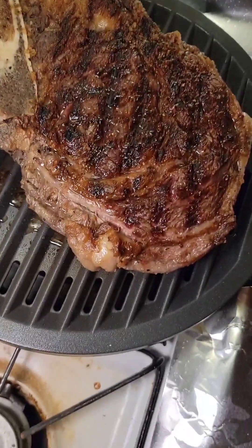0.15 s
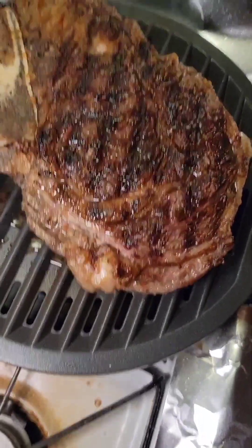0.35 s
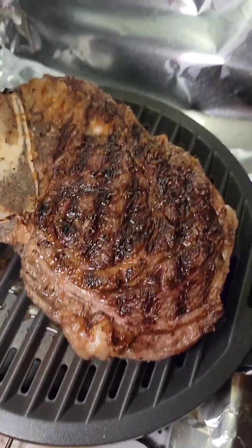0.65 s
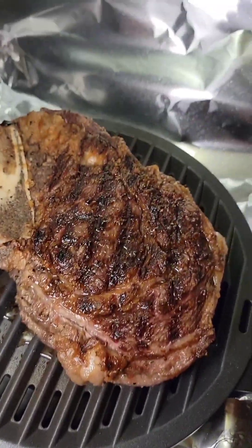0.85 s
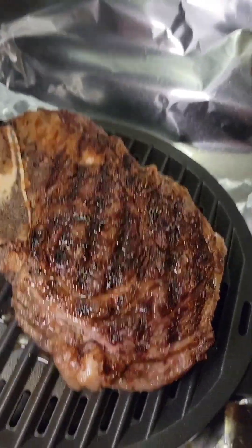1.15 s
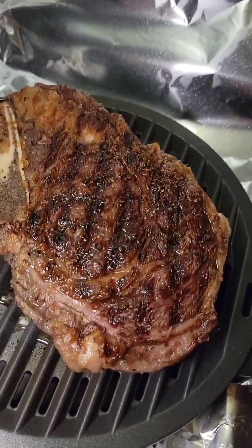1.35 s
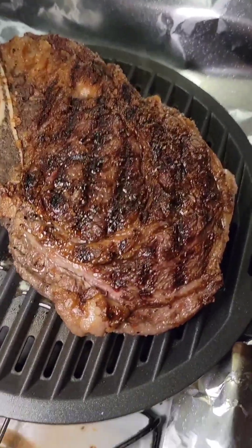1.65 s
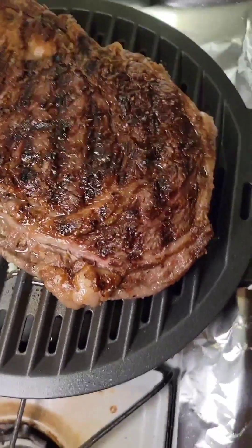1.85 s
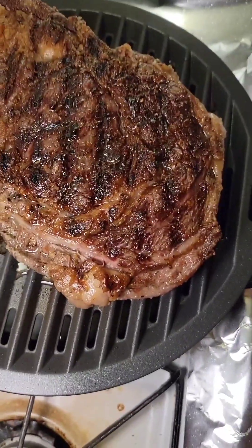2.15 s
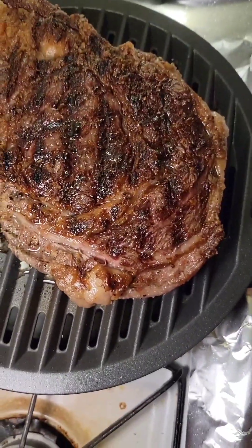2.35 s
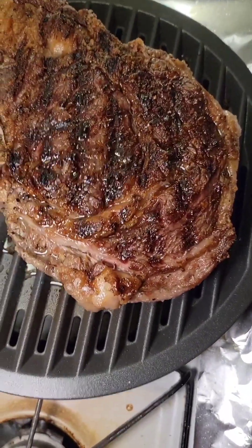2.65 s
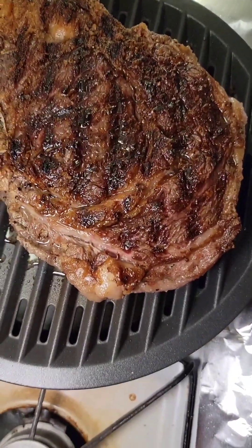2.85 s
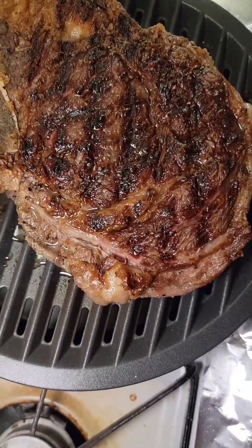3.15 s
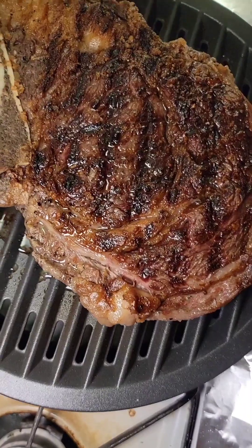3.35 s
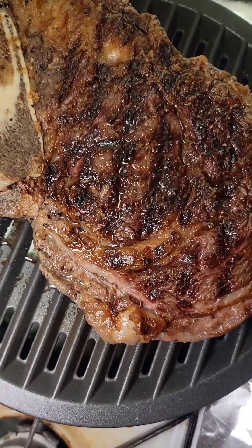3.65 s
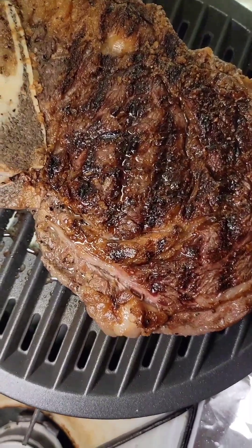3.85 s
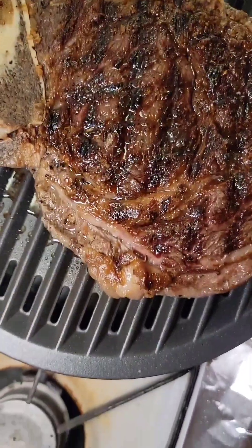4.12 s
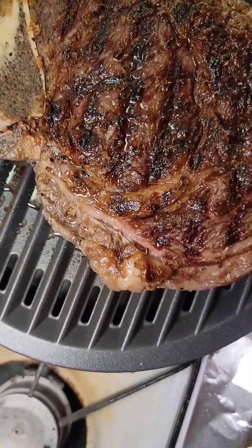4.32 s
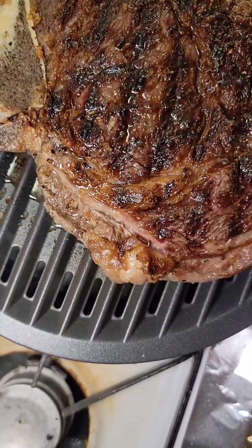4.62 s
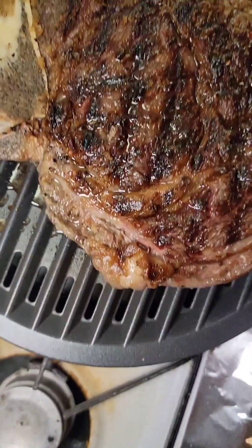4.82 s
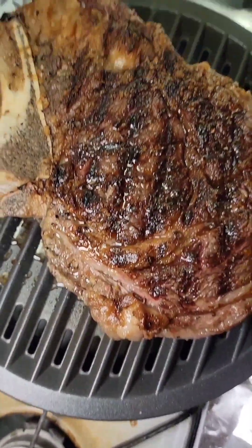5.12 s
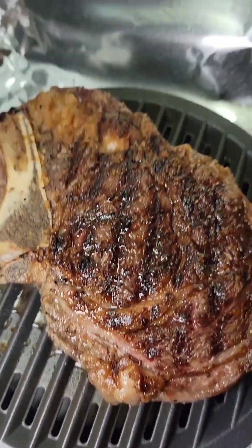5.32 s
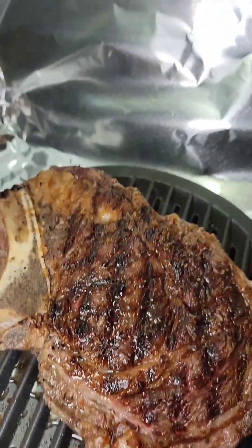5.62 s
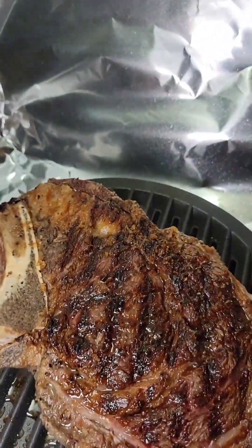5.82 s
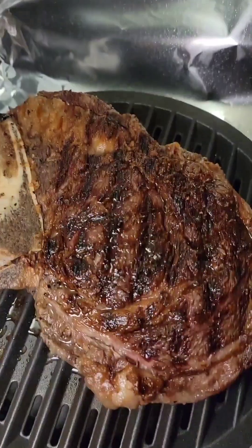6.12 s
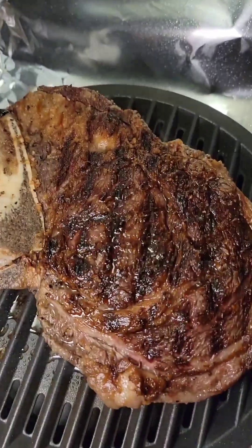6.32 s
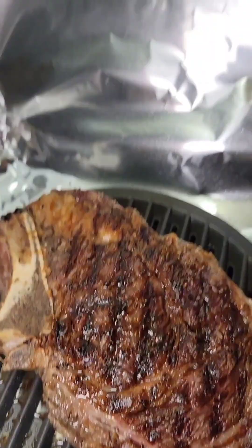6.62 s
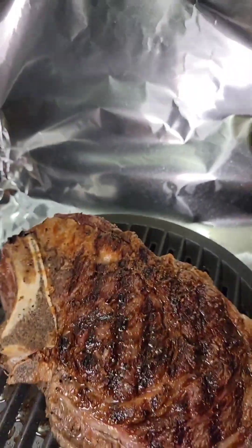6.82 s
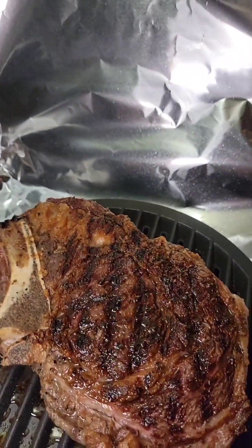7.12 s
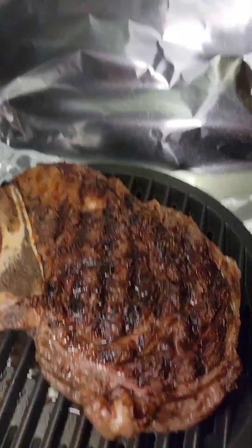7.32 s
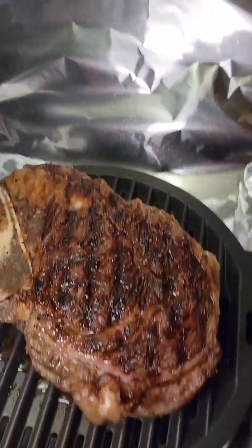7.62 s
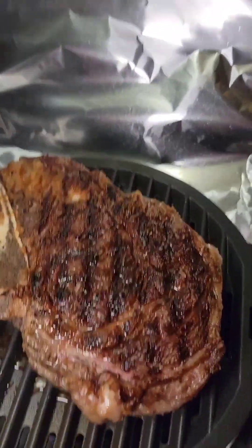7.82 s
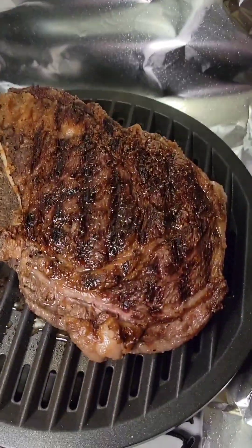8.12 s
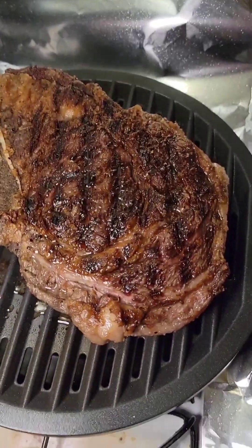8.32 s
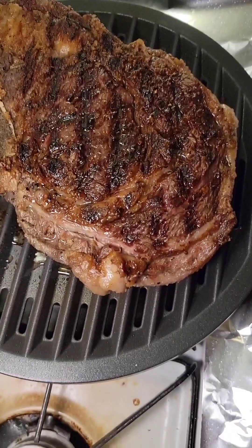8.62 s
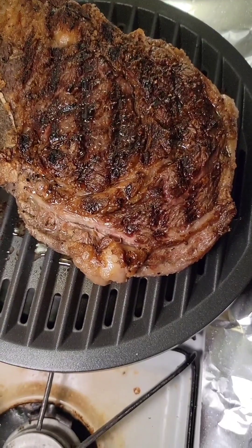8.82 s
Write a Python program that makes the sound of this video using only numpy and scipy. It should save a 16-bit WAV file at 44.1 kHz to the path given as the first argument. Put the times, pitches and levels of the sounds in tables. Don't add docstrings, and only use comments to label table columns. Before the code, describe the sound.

Bright, fine frying hiss and crackle with sharp fat spits, a brief strong flare, small plops, and a low extractor hood hum behind.

```python
import sys
import numpy as np
from scipy import signal
from scipy.fft import rfft, irfft, next_fast_len
from scipy.io import wavfile
from scipy.ndimage import uniform_filter1d

SR = 44100
rng = np.random.default_rng(int(sys.argv[2]) if len(sys.argv) > 2 else 0)


def gain_from_decibels(decibels):
    exponent = np.asarray(decibels, float) / 20
    return 10 ** exponent


def wav_out(sig):
    wavfile.write(sys.argv[1], SR, np.round(np.clip(np.atleast_2d(sig).T, -1, 1) * 32767).astype(np.int16))


N = 395577
TIME = np.arange(N) / SR
TOP_HZ = 15720
FOIL_DECAY_S, FOIL_DB = .004, -14

# [low f/Hz, high f/Hz, crackle share/1, port likeness/1, left minus right/dB]
BUBBLE_SIZES = [(680, 1436, 0.42, 0.89, 3.5), (1360, 2650, 0.78, 0.91, 2.4), (2740, 4270, 0.47, 1, 0),
                (4576, 8920, 0.74, 0.88, 2.1), (8720, 15800, 0.66, 1, 2.5)]
# [simmer level/dB, share of simmer swing/1, flare level/dB, relative flare decay rate/1]
BUBBLE_BOILING = [(-57, 1.08, -46, 0.79), (-52, 1.1, -45, 0.97), (-49.5, 0.23, -38.5, 0.86),
                  (-45, 0.98, -32.5, 0.96), (-39.5, 0.63, -28.5, 1.32)]
# [t/s, level over resting simmer/dB]
SIMMER_SWING = [(0, 4.5), (.3, 4), (.83, 3.5), (1.04, 4.5), (1.35, 5), (1.68, 2.5), (3.6, -5.3),
                (4.56, 0.5), (4.612, -9), (4.645, -3.5), (4.92, -1.5), (5.9, 0.5), (6.35, -2.3),
                (6.85, 2.5), (7.18, 1), (7.5, -0.1), (8.28, 1.3), (8.97, 0)]
# [t/s, rise/s, peak level/dB, decay/(dB/s), extra level per finer size/dB]
FAT_FLARES = [
    (1.715, 0.057, -0.4, 4.5, 0.16),
    (1.83, 0.15, 1.5, 38, 0),
    (2.3, 0.18, -2.5, 34, 0.5),
    (4.97, 0.071, -11.5, 34, 0.6),
    (5.03, .17, -8, 51, 2.5),
]
# [t/s, left minus right/dB]
HAND_TURN = [(0.0, -12), (1.05, -13), (3.12, -6), (4.89, -5), (5.2, -3.5), (5.62, -8.5), (6.57, -7),
             (8.97, -5.5)]
# [f/Hz, level/dB]
FRYING_TINT = [(600, -14), (1000, -13), (1500, -13.5), (2000, -5), (3000, -3), (4500, -3), (6000, -4.5),
               (7400, -3), (8300, -11), (10000, -9.5), (11500, -4.5), (13000, 1.3), (14500, 4),
               (16000, 3.3)]
# [f/Hz, width/Hz, level/dB]
PAN_HOLLOWS = [(1173, 103, 8.5), (1754, 77, -1), (2240, 10, 3), (3380, 510, 5), (7300, 1800, -33)]

# [f/Hz, level/dB]
HOOD_AIR = [(12, -39), (20, -5), (69, -7), (114, -1), (140, -10.5), (205, -17), (273, -12), (369, -18.5),
            (604, -10), (676, -21.5), (900, -32), (1170, -43), (1980, -120)]
# [f/Hz, likeness/1]
HOOD_COHERENCE = [(40, 0.74), (160, 1), (300, 0.6), (1400, 0.4)]
# [f/Hz, left minus right/dB]
HOOD_BALANCE = [(60, -1.5), (200, -2.5), (380, -10), (700, 4)]
# [f/Hz, rms level/dB, width/Hz]
HOOD_TONES = [(66.6, -57, 10), (119.54, -60, 7), (159.7, -60.5, 6.9), (307, -71, 5.7)]

# [t/s, peak level/dB, f/Hz, left minus right/dB]
AIR_BUMPS = [(.08, -45, 45.2, 2), (1.57, -41, 73.6, 0), (1.892, -36, 291, -4), (2.67, -41, 335, -7),
             (2.72, -42.5, 312, -19), (6.1, -51, 39.4, -2), (6.75, -41, 88, -6), (7.21, -74, 50.4, 3),
             (7.865, -44, 81, -.3), (8.2, -53, 30.6, -4), (8.59, -42, 59, -4), (8.88, -53, 33.6, 3)]
# [t/s, peak level/dB, f/Hz, left minus right/dB]
FAT_PLOPS = [(1.8753, -35, 1160, 0), (1.893, -31, 1890, -8), (1.9061, -29, 1140, 13),
             (2.423, -30, 2300, -12), (3.9787, -31.5, 1830, 4), (4.0053, -30, 1780, -2),
             (4.0446, -28.5, 1740, 2), (5.5006, -28, 1850, -3.0), (5.8461, -32, 2070, -6),
             (6.7027, -35, 1170, 5), (7.313, -39.5, 1250, -4)]
# [t/s, peak level/dB, f/Hz, left minus right/dB]
DULL_DRIPS = [
    (.327, -48, 730, 17),
    (1.874, -34, 686, 14),
    (1.892, -42.5, 410, -17),
    (2.695, -42, 460, -11),
    (4.042, -43, 810, -7),
    (5.497, -39.5, 523, -6),
    (6.813, -39.5, 580, -7),
    (6.831, -36.5, 383, -7),
]

# [t/s, tick level/dB]
SMALL_SPATTER = [(.9662, -32), (.18, -33), (.197, -31), (.234, -41), (.5062, -31), (.706, -37), (.832, -25),
                 (0.854, -28), (1.282, -22.5), (1.5708, -36), (1.663, -26), (4.149, -22), (4.2713, -27),
                 (4.8593, -32), (4.952, -21.5), (4.792, -27), (5.6005, -34), (6.225, -33), (6.6508, -24),
                 (6.8588, -26), (7.902, -25.5), (7.199, -36), (7.7465, -37), (8.0337, -24.5), (8.3475, -33),
                 (8.362, -22), (8.425, -20.5), (8.3948, -21), (8.612, -23), (8.832, -28)]
# [t/s, ring f/Hz, ring level/dB, tick level/dB]
BIG_SPITS = [(.3511, 6160, -27, -18), (.4375, 6280, -37, -14.5), (.5615, 7000, -28, -24),
             (.896, 5730, -27.5, -18), (1.0256, 6730, -22.5, -15), (1.1338, 6790, -31, -19),
             (1.2326, 4550, -26, -20), (1.3487, 7440, -26, -27), (1.3766, 5670, -24.5, -17),
             (1.4016, 6720, -27, -14), (1.7175, 3380, -27, -23), (1.7288, 3240, -27, -22),
             (1.7437, 3500, -31, -13), (2.4244, 5560, -24, -26), (2.597, 5750, -19, -34),
             (2.7596, 5400, -26, -27), (2.8103, 5350, -22, -34), (2.8412, 1780, -28, -30),
             (2.861, 6400, -17, -22), (3.166, 3670, -24, -27), (3.8282, 3450, -27.5, -19),
             (4.562, 1870, -35, -26), (4.9806, 5070, -24, -31), (5.4995, 7100, -28, -34),
             (5.8458, 4600, -28, -28), (6.3747, 2240, -34.5, -22), (7.0256, 6880, -29, -21),
             (7.7738, 3400, -30.5, -20), (8.2375, 3700, -26.5, -18), (8.7844, 5000, -27, -21)]
# [t/s, ring f/Hz, ring level/dB, tick level/dB]
RIM_POP = (1.894, 3470, -9, -33)
# [t/s, length/s, f/Hz, level/dB, left minus right/dB]
STEAM_JETS = [
    (1.716, 0.14, 3380, -32.5, -3),
    (1.727, 0.079, 2220, -39, -8),
    (1.88, 0.49, 5800, -31.5, -15),
    (2.595, 0.85, 5500, -37.5, -7),
    (4.635, 0.15, 5270, -36.5, 2),
    (4.994, 0.17, 3300, -42, -6),
    (4.998, 0.19, 4870, -41.5, -1),
    (5.124, 0.17, 7300, -42, 13),
    (8.183, 0.058, 7400, -38.5, -2),
]


def unit(x):
    return x / np.sqrt(np.mean(x ** 2))


def peak(x):
    return x / np.abs(x).max()


def along(table, hz):
    f, value = np.transpose(table)
    return np.interp(np.log(hz + 1), np.log(f), value)


def at_time(table):
    return np.interp(TIME, *np.transpose(table))


def colour(x, gain):
    size = next_fast_len(N)
    spectrum = rfft(x, size) * gain(np.fft.rfftfreq(size, 1 / SR))
    return irfft(spectrum, size)[..., :N]


def band(x, low_hz, high_hz):
    return signal.sosfilt(signal.butter(4, [low_hz, high_hz], "band", fs=SR, output="sos"), x)


def ring(x, hz, width_hz):
    return signal.lfilter(*signal.iirpeak(hz, hz / width_hz, SR), x)


def walk(rate):
    held = rng.standard_normal(4000)[(TIME * rate).astype(int)]
    return unit(uniform_filter1d(held, int(SR / rate)))


def pair(pan_db):
    return gain_from_decibels(np.array([pan_db, -pan_db]) / 2)


def late(x, lag):
    return x[np.clip(np.arange(N) - np.round(lag).astype(int), 0, N - 1)]


def add(out, s, sound):
    start = int(s * SR)
    out[:, start:start + sound.shape[1]] += sound[:, :N - start]


def echoes(x, db):
    t = TIME[:1500]
    spray = rng.standard_normal((2, len(t))) * np.exp(-t / FOIL_DECAY_S) * (t > .0004)
    return gain_from_decibels(db) / 4 * signal.oaconvolve(x, spray, axes=1)[:, :N]


def foil(x):
    return x + echoes(x, FOIL_DB)


def pan_colour(x):
    x = x + sum(gain_from_decibels(db) * ring(x, hz, width_hz) for hz, width_hz, db in PAN_HOLLOWS)
    return colour(x, lambda hz: gain_from_decibels(along(FRYING_TINT, hz)))


def boiling():
    swing, levels = at_time(SIMMER_SWING), []
    for step, (simmer_db, follow, flare_db, haste) in enumerate(BUBBLE_BOILING):
        power = gain_from_decibels(simmer_db + follow * swing) ** 2
        for s, rise_s, db, fall, finer_db in FAT_FLARES:
            onset = np.clip((TIME - s) / rise_s, 0, 1)
            after_s = np.maximum(TIME - s - rise_s, 0)
            level_db = flare_db + db + finer_db * (step - 2) - haste * fall * after_s
            power = power + (onset * gain_from_decibels(level_db)) ** 2
        levels.append(10 * np.log10(power))
    return levels


def crackle(spread_db, cap):
    bubbles, port_lag_s = 40000, .0003
    when, size, lag, side, push = rng.random((bubbles, 5)).T
    size = gain_from_decibels(spread_db * np.minimum(-np.log(1 - size), cap)) * np.sign(push - .5)
    out = np.empty((2, N))
    for port, sign in enumerate((1, -1)):
        at = when * N + sign * (lag - .5) * port_lag_s * SR
        at = np.clip(at, 0, N - 1).astype(int)
        out[port] = np.bincount(at, size * gain_from_decibels(sign * 7.7 * (side - .5)), N)
    turn = 1.7 * TIME
    return unit(out + np.cos(turn) * echoes(out, FOIL_DB) + np.sin(turn) * echoes(out, FOIL_DB))


def shared_hiss():
    steam, drift = rng.standard_normal(N), 2.8 * TIME + .4 * walk(1.2)
    both = np.array([steam, late(steam, 11 + 12 * np.sin(.32 * drift))])
    echo_db = -9
    return unit(both + np.cos(drift) * echoes(both, echo_db) + np.sin(drift) * echoes(both, echo_db))


def sizzle():
    levels, mist_pan_db = boiling(), at_time(HAND_TURN)
    bursts = pan_colour(crackle(spread_db=2.5, cap=6.2))
    shared = pan_colour(shared_hiss())
    spread = pan_colour(rng.standard_normal((2, N)))
    sputter_db = 0.28 * walk(8.8) + 0.91 * walk(45) + 0.8 * walk(150)
    out = 0
    for db, (low_hz, high_hz, share, like, lean_db) in zip(levels, BUBBLE_SIZES):
        flare_db = np.maximum(db - np.median(db), 0)
        share = np.clip(share * gain_from_decibels(-.7 * flare_db), 0, 1)
        like = np.clip(like, 0, 1)
        hiss = like * shared + np.sqrt(1 - like ** 2) * spread
        boil = band(share * bursts + np.sqrt(1 - share ** 2) * hiss, low_hz, high_hz)
        dull = signal.lfilter(*signal.butter(2, np.sqrt(low_hz * high_hz), fs=SR), boil)
        boil = dull * gain_from_decibels(1.0 * walk(20)) + (boil - dull) * gain_from_decibels(0.8 * walk(18))
        side_db = mist_pan_db * (1 if high_hz > TOP_HZ else .15)
        out = out + unit(boil * gain_from_decibels(sputter_db)) * gain_from_decibels(db + 3.0) * pair(side_db + lean_db)
    return out


def hood():
    left, other = rng.standard_normal((2, N))

    def like(hz):
        return np.clip(along(HOOD_COHERENCE, hz), 0, 1)

    right = colour(late(left, 30), like) + colour(other, lambda hz: np.sqrt(1 - like(hz) ** 2))
    air = colour(np.array([left, right]), lambda hz: gain_from_decibels(along(HOOD_AIR, hz)) * pair(along(HOOD_BALANCE, hz)))
    air = unit(air) * gain_from_decibels(-52.5) * gain_from_decibels(1.2 * walk(7))
    tones = 0
    for hz, db, width_hz in HOOD_TONES:
        tone = ring(ring(rng.standard_normal(N), hz, width_hz), hz, width_hz)
        tones = tones + gain_from_decibels(db) * unit(tone)
    mains_hz, mains_db = 119.3, -51
    mains = gain_from_decibels(mains_db) * np.sin(2 * np.pi * mains_hz * TIME + 0.68 * walk(3.1))
    return air + tones + mains


def thuds(table, turns):
    out, t = np.zeros((2, N)), TIME[:9000]
    for s, db, hz, pan_db in table:
        cycles = t * hz / turns
        shape = cycles * np.exp(1 - cycles)
        blur = unit(ring(rng.standard_normal((2, len(t))), hz, 0.6 * hz))
        knock = shape * (0.28 * np.sin(2 * np.pi * hz * t) + 0.45 * blur)
        add(out, s, gain_from_decibels(db) * pair(pan_db)[:, None] * knock)
    return out


def spits():
    out, t = np.zeros((2, N)), TIME[:1800]
    pitch = rng.uniform(2930, 5500, len(SMALL_SPATTER))
    small = [(s, hz, db - 7.5, db) for (s, db), hz in zip(SMALL_SPATTER, pitch)]
    drops = list(BIG_SPITS) + small
    scatter_db, pop_pan_db = 3, 21
    pans = [np.interp(s, *np.transpose(HAND_TURN)) + scatter_db * rng.standard_normal() for s, *_ in drops]
    burst = np.clip(t / .0004, 0, 1) * (np.exp(-t / .0006) + .07 * np.exp(-t / .009))
    for (s, hz, ring_db, tick_db), pan_db in zip(drops + [RIM_POP], pans + [pop_pan_db]):
        spray = rng.standard_normal((2, 2, len(t)))
        tick = peak(band(spray[0] * burst, 11900, 21400)) * pair(0.98 * pan_db + 1.0)[:, None]
        cycles = t * hz / 1.8
        pocket = np.sin(2 * np.pi * hz * t) * cycles * np.exp(1 - cycles)
        puff = peak(band(spray[1] * burst, hz / 2.21, min(1.93 * hz, 9500)))
        body = (0.49 * pocket + 0.74 * puff) * pair(0.085 * pan_db)[:, None]
        add(out, s, gain_from_decibels(tick_db + 7.0) * tick + gain_from_decibels(ring_db + 8.5) * body)
    return foil(out)


def jets():
    out, t = np.zeros((2, N)), TIME[:30000]
    for s, length_s, hz, db, pan_db in STEAM_JETS:
        width_hz = 0.23 * hz
        air = ring(ring(rng.standard_normal((2, len(t))), hz, width_hz), hz, width_hz)
        flutter = gain_from_decibels(1.6 * walk(31)[:len(t)])
        shape = np.clip(t / .012, 0, 1) * np.exp(-(t / length_s) ** 2.0) * flutter
        add(out, s, gain_from_decibels(db) * pair(pan_db)[:, None] * unit(air) * shape)
    return out


def scene():
    bumps = thuds(AIR_BUMPS, turns=1.9)
    plops = foil(thuds(FAT_PLOPS + DULL_DRIPS, turns=4.2))
    return sizzle() + hood() + bumps + spits() + plops + jets()


def top_cut(x):
    return signal.sosfilt(signal.butter(12, 16940, fs=SR, output="sos"), x)


def record(dry):
    rounded = np.tanh(.7 * dry) / .7
    low_pass = signal.ellip(10, .3, 70, TOP_HZ, fs=SR, output="sos")
    mix = signal.sosfilt(low_pass, rounded)
    return top_cut(mix)


dry = scene()
out = record(dry)
wav_out(out)
```